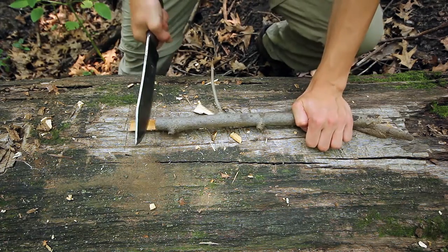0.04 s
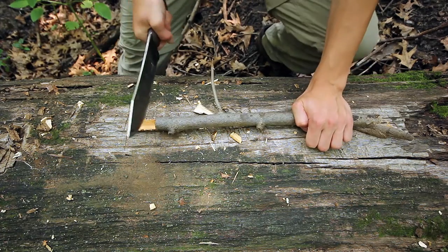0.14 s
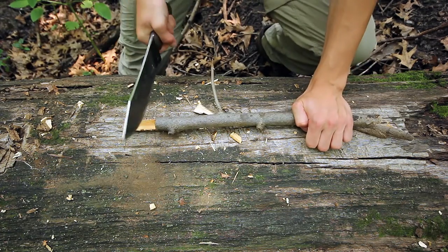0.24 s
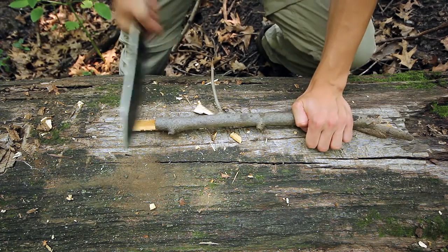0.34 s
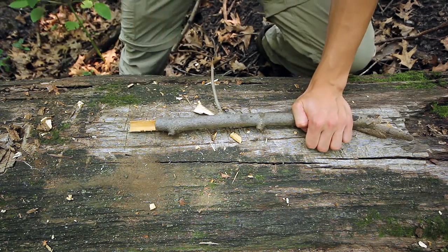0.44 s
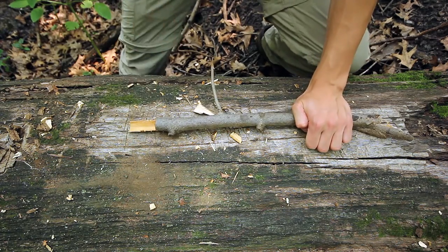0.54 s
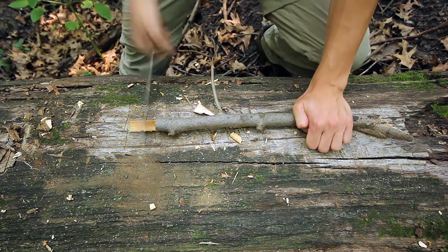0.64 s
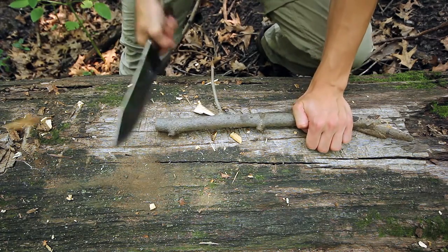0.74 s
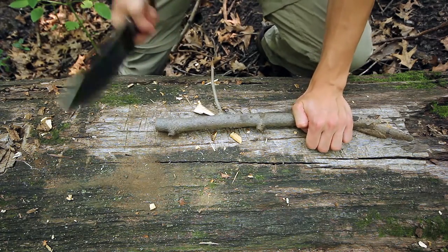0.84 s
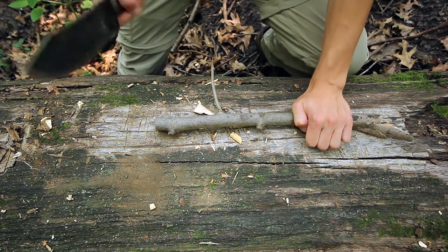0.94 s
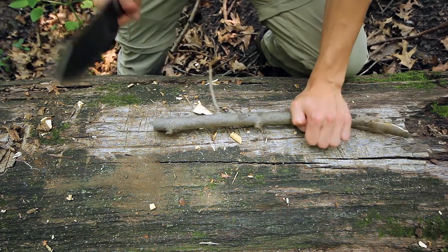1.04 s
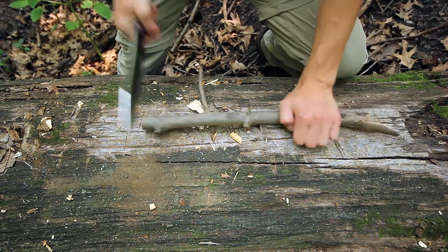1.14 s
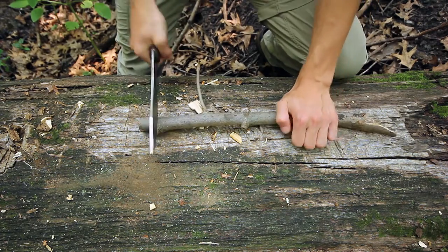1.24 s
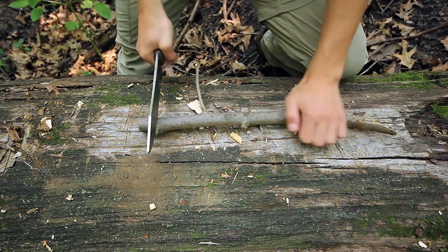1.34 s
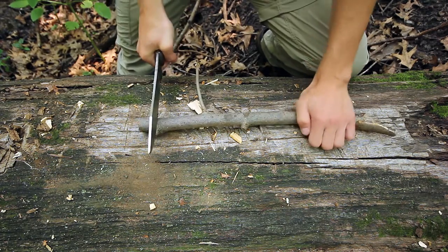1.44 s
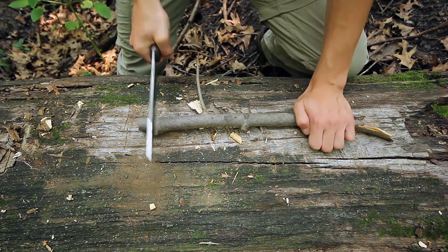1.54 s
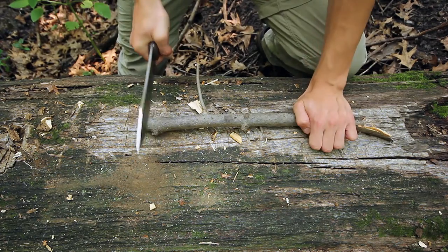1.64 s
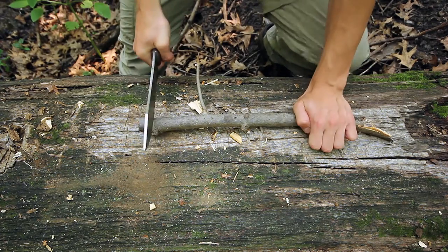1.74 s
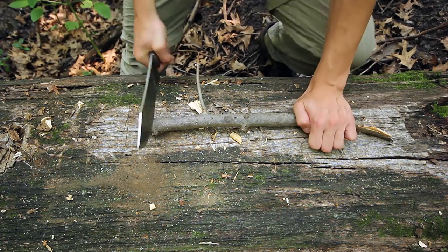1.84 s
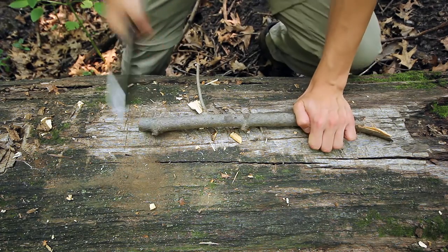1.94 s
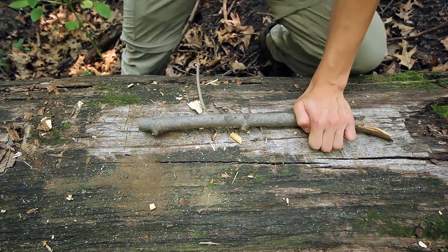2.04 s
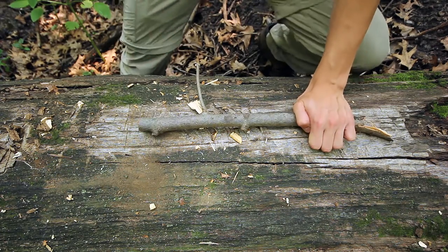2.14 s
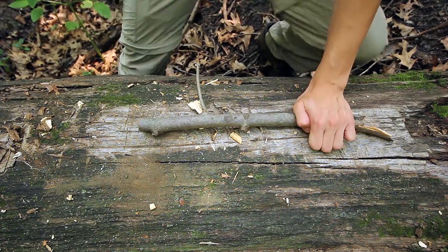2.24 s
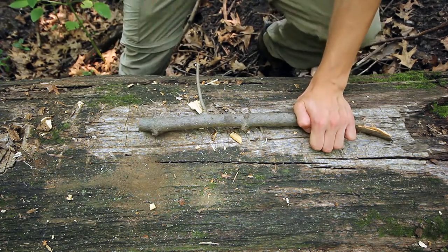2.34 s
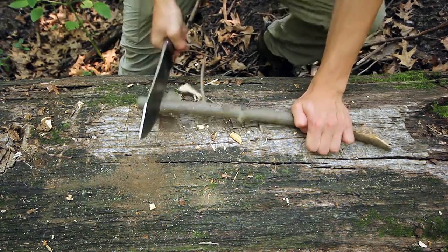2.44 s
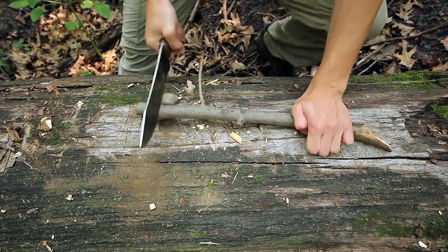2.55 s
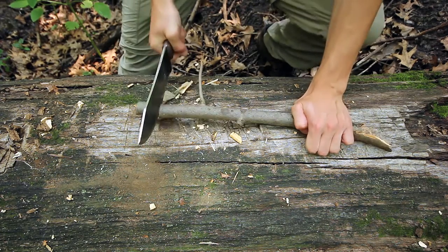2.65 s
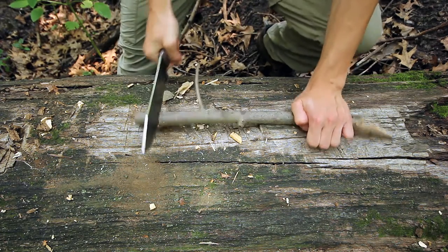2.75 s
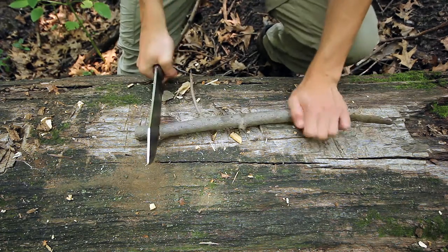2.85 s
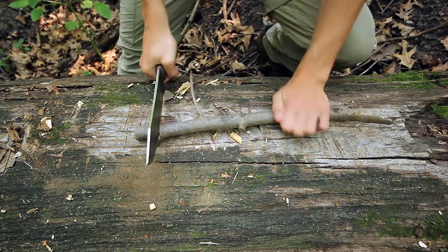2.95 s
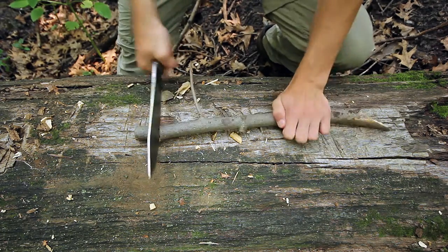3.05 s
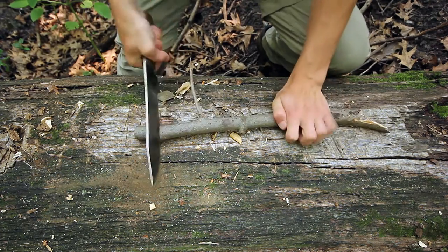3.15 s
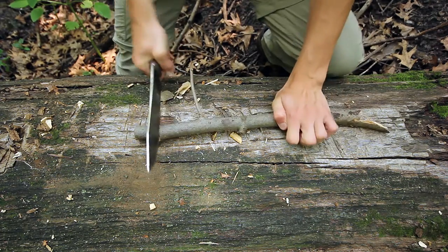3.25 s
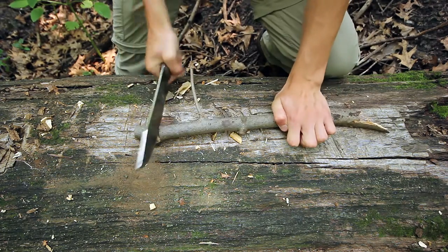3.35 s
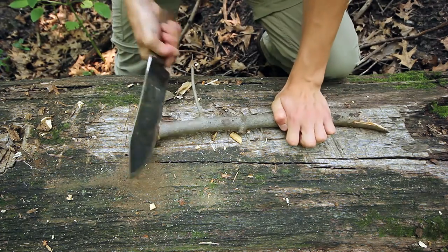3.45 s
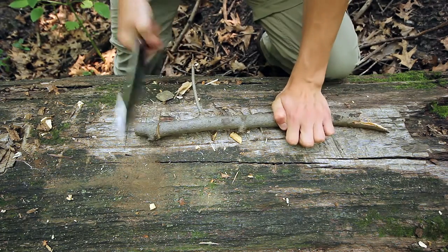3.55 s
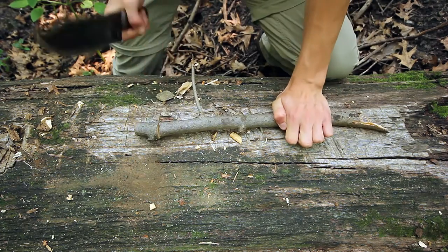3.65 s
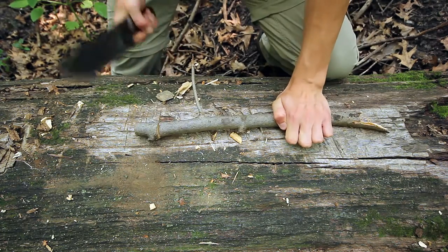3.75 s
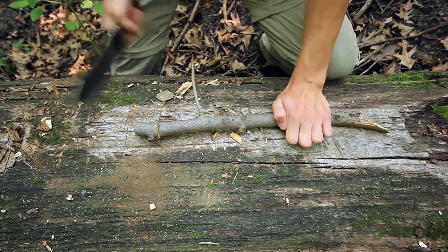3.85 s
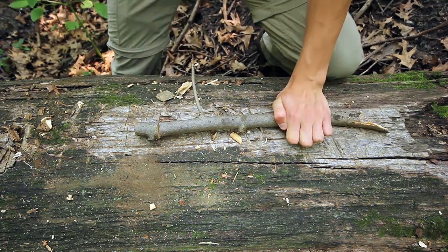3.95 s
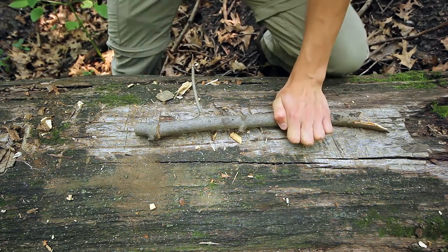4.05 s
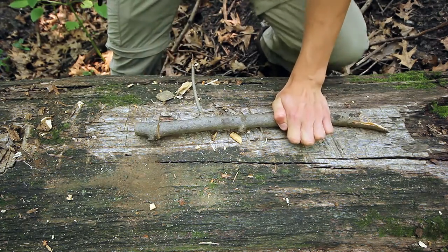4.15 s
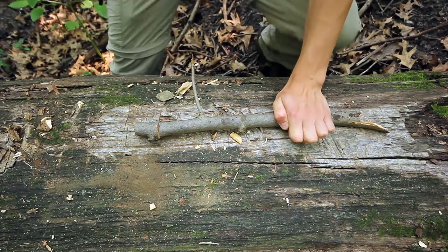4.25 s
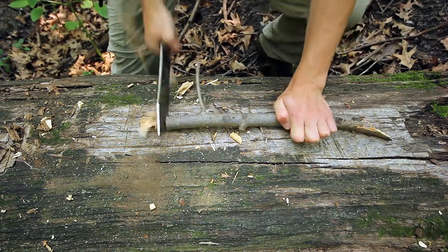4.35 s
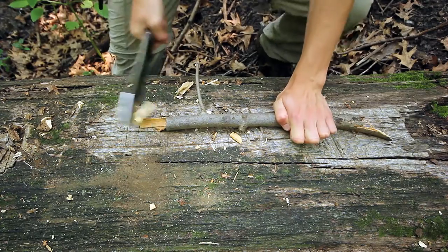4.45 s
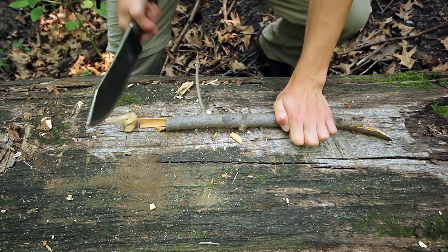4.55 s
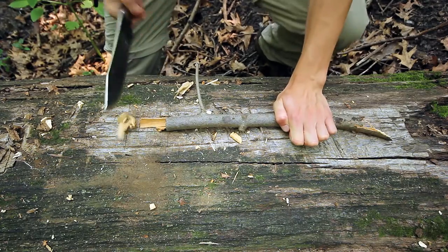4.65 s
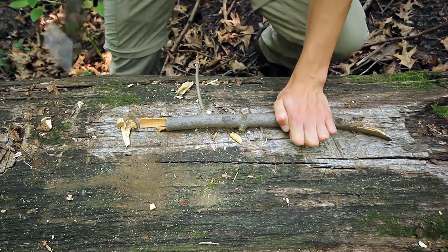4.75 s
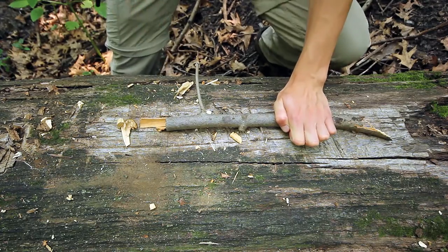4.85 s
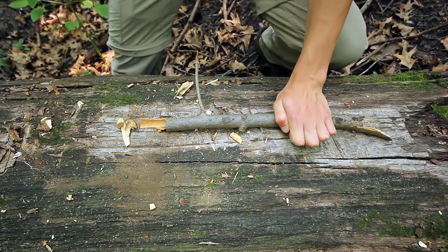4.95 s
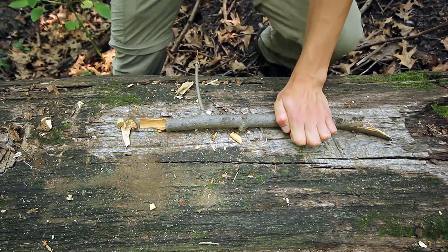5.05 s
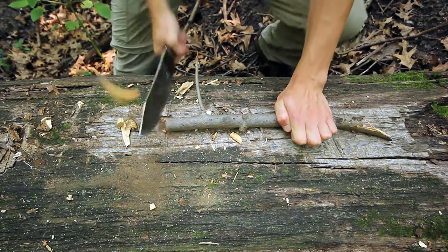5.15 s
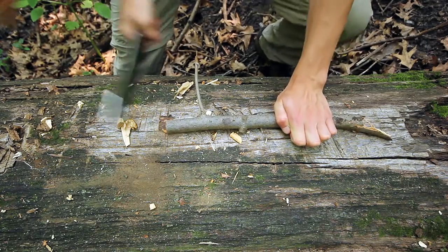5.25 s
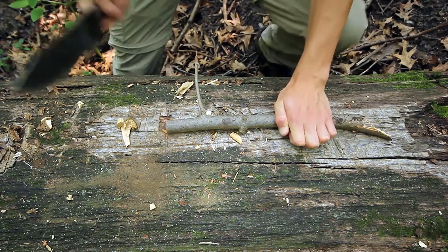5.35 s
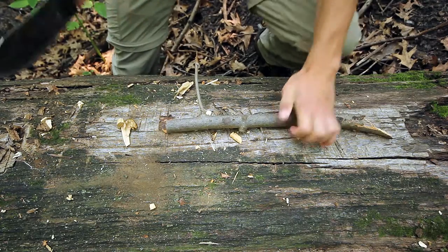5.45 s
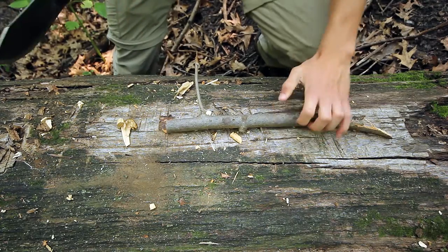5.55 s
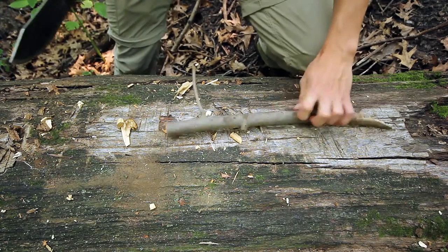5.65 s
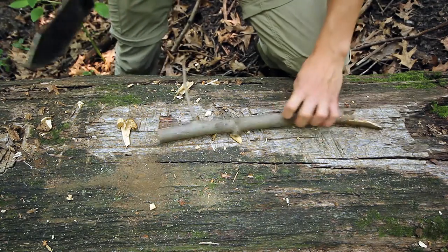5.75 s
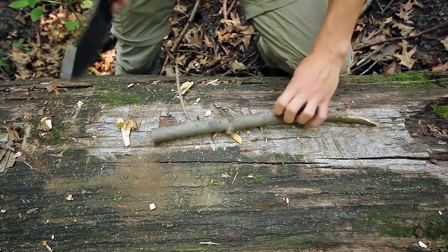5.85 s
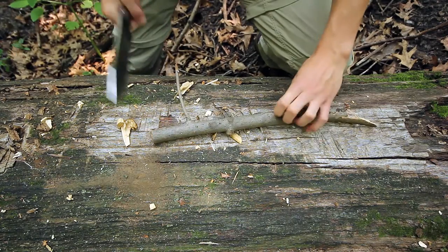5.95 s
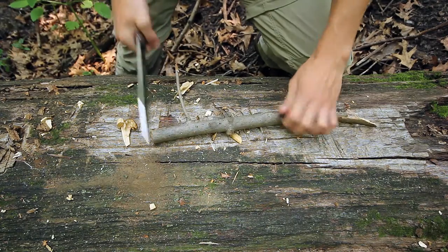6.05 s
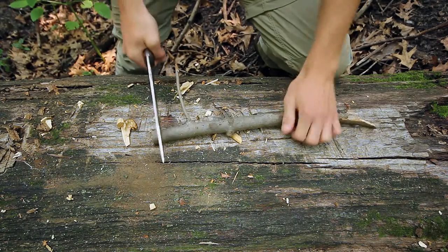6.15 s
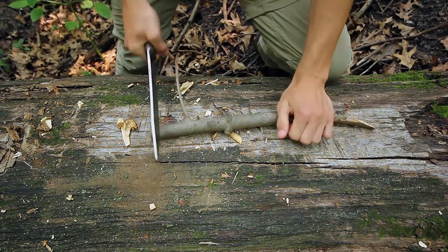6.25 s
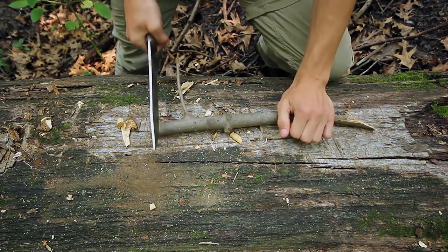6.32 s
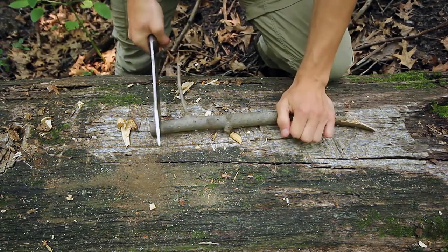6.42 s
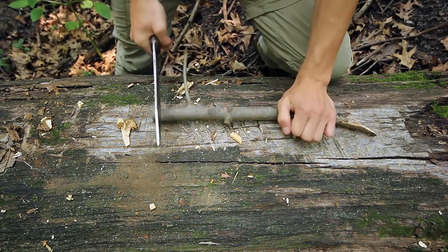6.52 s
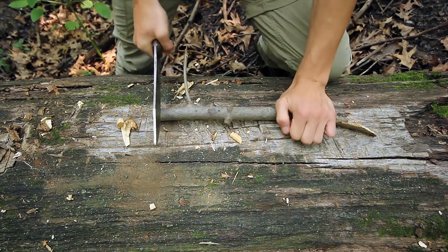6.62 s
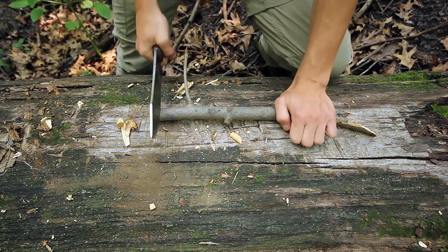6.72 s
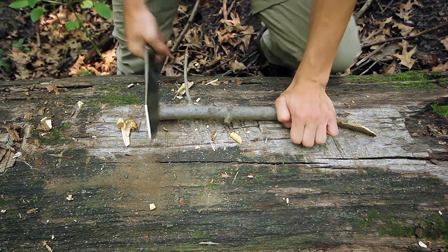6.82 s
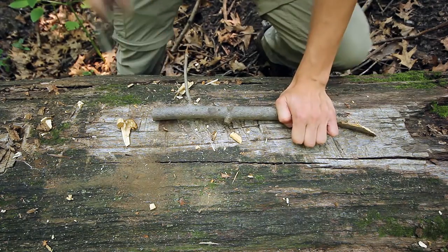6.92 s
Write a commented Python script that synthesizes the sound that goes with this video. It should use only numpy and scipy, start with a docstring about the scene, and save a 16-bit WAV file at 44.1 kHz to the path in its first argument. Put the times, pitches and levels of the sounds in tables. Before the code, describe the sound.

Close, dry cracks of a blade splitting a thin stick against a solid log, five blows irregularly spaced, the first only a light snap. Soft knocks and tiny ticks of aiming and falling chips come in between. A bright, fizzing brook gurgles throughout. The loudest chops slightly overload the microphone, duck the water for a moment and leave a faint woodland echo.

```python
"""A trickling stream in the woods, heard behind a heavy knife close to the microphone, chopping a thin
stick on a fallen log. The water is noise, ringing bubbles and spray, coloured by its stones.
Between chops the blade taps the stick to take aim, and chips drop onto the log and dry leaves: ticks and
soft knocks. A chop is a burst of snapping fibres with wood modes and blade ring; log, ground and trees echo.
Strong chops overload the microphone, and gain control ducks the water for a moment."""
import sys
import numpy as np
from scipy import signal
from scipy.fft import rfft, irfft
from scipy.io import wavfile
from scipy.ndimage import uniform_filter1d, minimum_filter1d

SR = 44100
rng = np.random.default_rng(int(sys.argv[2]) if len(sys.argv) > 2 else 0)


def log_audio(samples):
    """Write samples as a 16-bit WAV file to the path given in sys.argv[1]."""
    # one column per channel
    frames = np.atleast_2d(samples).T
    # limit to full scale, then quantise
    limited = np.clip(frames, -1, 1)
    pcm = np.round(limited * 32767).astype(np.int16)
    wavfile.write(sys.argv[1], SR, pcm)


N = 307814  # length in samples, about 7 s

# Colour of the stream. Each row: frequency in Hz, relative density in dB per Hz.
WATER_COLOUR = [(15, -61), (25, -16), (87, -9), (217, -9), (256, -5.5), (545, -6), (659, -4.5), (1100, -12),
                (1560, -3), (1790, -1.5), (2910, -7.5), (4740, -11), (7310, -12.5), (14800, -24),
                (16000, -28)]
# Hollows among the stream's stones. Each row: frequency in Hz, width in Hz, lift in dB.
STONE_HOLLOWS = [(664, 46, 4), (927, 240, 5.5), (1190, 110, 3), (1550, 140, 2), (1790, 274, -5.5),
                 (2340, 260, 1.5), (2867, 26, 7), (3670, 37, 3.5), (5740, 130, 5), (6430, 270, 3)]
# The clearest bubbles, over the swarm. Each row: start in seconds, level in dB, starting pitch in Hz.
CLEAR_BUBBLES = [(.486, -19, 2370), (1.7236, -20.5, 2250), (1.744, -17, 2810), (1.8385, -17.5, 3700),
                 (2.7247, -16.5, 2050), (3.3324, -18, 2850), (5.1685, -17, 5540), (5.741, -22, 1670),
                 (5.888, -20, 2700), (6.0138, -15.5, 2870), (6.0912, -19, 2340), (6.7224, -20, 2800),
                 (6.743, -20, 1534)]
# Light touches of blade, stick and chips, and the further splits just after the chop at 4.38 s. # Each row:
# start in seconds, tick level in dB, contact time in seconds, tick resonance in Hz, # knock pitch in Hz, knock
# level in dB.
LIGHT_TOUCHES = [(0.1158, -23.5, .0004, 4600, 1500, -40), (0.463, -27.5, .001, 2070, 1480, -25),
                 (0.535, -33, 0.0009, 2310, 467, -27), (.656, -21.5, 0.0031, 8500, 900, -32),
                 (1.3092, -23, 0.0017, 4700, 780, -15), (1.311, -44, .0017, 2500, 175, -29),
                 (1.7614, -21, 0.0014, 4800, 412, -14), (1.7723, -25, 0.00092, 4900, 400, -43),
                 (1.807, -40, .001, 2500, 400, -25), (2.0595, -25, .0007, 2290, 1720, -17),
                 (2.506, -19, 0.0023, 3620, 199, -29), (2.853, -24, 0.0019, 2200, 1180, -19.5),
                 (4.2484, -21, 0.00086, 2500, 1940, -33), (4.39, -7.5, 0.00093, 2670, 730, -8),
                 (4.3943, -12, .0004, 5000, 1000, -34), (4.543, -35, 0.00094, 1150, 720, -19),
                 (4.705, -24.5, 0.011, 8650, 400, -40), (4.939, -32, .0015, 1720, 820, -19.5),
                 (4.9705, -13, .0005, 3240, 650, -22), (5.2145, -23, .001, 2870, 860, -12),
                 (6.191, -32, 0.005, 6500, 344, -28), (6.567, -28.5, 0.0031, 7040, 900, -31)]
# Colour of splitting wood fibres. Each row: frequency in Hz, relative density in dB per Hz.
FIBRE_COLOUR = [(30, -63), (120, -52), (300, -10.5), (800, 0.5), (1500, 2), (2800, 2.5), (5000, 0.5),
                (8000, -2.5), (12000, -9.5), (16000, -26)]
# The chops. Each row: start in seconds, crack level in dB, cutting time in seconds, upper resonance in Hz
# and its strength in dB, lower resonance in Hz and its strength in dB, stick knock in Hz and its level in dB,
# log thump in Hz and its level in dB, blade ring level in dB.
KNIFE_CHOPS = [(.6529, -4, .0001, 8570, 18, 6900, 10.5, 890, -26, 295, -20, -55),
               (.7285, 3, 0.0029, 4480, 11.5, 2970, 1.5, 695, 6, 450, -1.5, -12),
               (2.456, 4, .0012, 3500, 7.5, 1560, 5, 1230, 5.5, 263, -0.5, -55),
               (4.3804, 3, 0.003, 3670, 9, 2200, 2, 930, 7, 390, 9.5, -50),
               (5.1877, 9, 0.0011, 5070, 11, 2740, 8, 709, 12.5, 450, 8.5, -38)]
# Modes of the ringing blade. Each row: frequency in Hz, relative level in dB, 60 dB decay in seconds.
BLADE_MODES = [(4081, -8, .06), (7700, -3, .06), (13370, -3, .06)]
# Colour of the echo from the trees. Each row: frequency in Hz, relative gain in dB.
TREE_COLOUR = [(60, -19), (150, -1), (400, -1.5), (1000, 0.5), (3000, 1.5), (4500, 2), (6000, 0),
               (9000, -5.5), (16000, -34)]

BUBBLE_CYCLES = 68  # a clear bubble falls 60 dB in so many cycles, so small ones die sooner
TICK_T60_S, TICK_DRAG = 0.01, 4.0  # a tick's decay: TICK_T60_S plus TICK_DRAG times its contact time
TICK_LIFT_DB = 8  # strength of a tick's resonance
# Decay of a light knock at KNOCK_HZ; higher knocks die sooner by the power KNOCK_DAMPING.
KNOCK_HZ, KNOCK_T60_S, KNOCK_DAMPING = 400, 0.031, 0.53
CRACK_T60_S = 0.011  # decay of the snapping once the edge is through
STICK_CYCLES, LOG_T60_S = 13, 0.014  # stick decay in cycles; log decay in seconds
OVERTONE_RATIO, OVERTONE_DB = 1.63, -2  # the stick's second mode, against its first
EDGE_HZ = 16150  # upper limit of the recorder's band


def gain_of(db):
    """Turns decibels into a factor."""
    return 10 ** (np.asarray(db) / 20)


def evened(x):
    """Scales to an rms of 1."""
    return x / np.sqrt(np.mean(x ** 2) + 1e-20)


def read(points, hz):
    """Reads a spectrum on a log-frequency axis."""
    f, value = np.transpose(points)
    return np.interp(np.log(hz + 1), np.log(f + 1), value)


def add(mix, s, sound):
    """Mixes a sound in at time s."""
    part = mix[max(round(s * SR), 0):][:len(sound)]
    part += sound[:len(part)]


def noise(gain):
    """Random-phase noise of rms 1 with the given relative gain in each frequency bin."""
    phase = 2 * np.pi * rng.random(len(gain))
    return evened(irfft(gain * np.exp(1j * phase)))


def fade(t, t60):
    """Free decay: 60 dB down after t60 seconds."""
    return np.exp(-np.log(1000) * t / t60)


def wander(per_s):
    """Random wandering of rms 1, with per_s new values a second joined by straight lines."""
    knots = rng.standard_normal(2000)
    return evened(np.interp(np.arange(N) * per_s / SR, np.arange(len(knots)), knots))


def scatter(per_s, spread_db):
    """Random impulses of either sign, mostly small and a few large."""
    size = gain_of(spread_db * np.minimum(rng.exponential(1, N), 4))
    return size * rng.choice([-1, 1], N) * (rng.random(N) < per_s / SR)


def bubble(hz, t60, glide=0.067):
    """A bubble rings and rises a little in pitch as it nears the surface."""
    t = np.arange(int(t60 * SR) + 2) / SR
    tone = np.sin(2 * np.pi * hz * t * (1 + glide * t / t60))
    return tone * fade(t, t60) * (1 - np.exp(-t * hz / 1.5))


def bubble_swarm(bubbles_per_s, cycles, gurgle_db, small_hz, count):
    """Many small bubbles ring at random; bubbles of like size swell together in gurgles."""
    swarm = np.zeros(N)
    for pitches in np.geomspace(500, 10500, count).reshape(-1, 10):
        rings = [bubble(f * rng.uniform(.98, 1.02), min(cycles * rng.uniform(.6, 1.5) / f, .035))
                 for f in pitches]
        group = np.zeros(N)
        for ring in rings:
            starts = scatter(bubbles_per_s / count, 3.3)
            group += signal.oaconvolve(starts, ring / np.linalg.norm(ring))[:N]
        # the smallest bubbles are faint
        share = np.sqrt(pitches[0]) / np.hypot(1, (pitches[0] / small_hz) ** 2)
        swarm += share * group * gain_of(gurgle_db * wander(35))
    return swarm


def spray(ticks_per_s=220, spread_db=5, life_s=0.0024, count=6):
    """Tiny drops burst on stone: decaying bursts of noise, each about an octave wide."""
    hz = np.fft.rfftfreq(N, 1 / SR)
    spectrum = 0
    for centre_hz in np.geomspace(1500, 12000, count):
        size = signal.lfilter([1], [1, -np.exp(-1 / (life_s * SR))], scatter(ticks_per_s, spread_db))
        band = np.exp(-(2 * np.log2((hz + 1) / centre_hz)) ** 2 / 2)
        spectrum = spectrum + rfft(evened(size * rng.standard_normal(N))) * band
    return irfft(spectrum, N)


def stream(wash_db=-40.5, fizz_db=-40, spray_db=-40.5, surge_db=1):
    """A wash of far water, a swarm of small bubbles and bright ticks of spray, coloured by the stones."""
    hz = np.fft.rfftfreq(N, 1 / SR)
    colour_db = read(WATER_COLOUR, hz)
    for f, width, db in STONE_HOLLOWS:
        colour_db = colour_db + db * np.exp(-2 * ((hz - f) / width) ** 2)
    colour = gain_of(colour_db)
    swarm = bubble_swarm(bubbles_per_s=1000, cycles=34, gurgle_db=3.0, small_hz=5000, count=80)
    water = gain_of(wash_db) * noise(colour / np.hypot(1, hz / 11000))
    water += gain_of(fizz_db) * evened(irfft(rfft(swarm) * colour, N))
    water += gain_of(spray_db) * evened(irfft(rfft(spray()) * colour, N))
    water *= gain_of(surge_db * wander(30))
    for s, db, f in CLEAR_BUBBLES:
        add(water, s, gain_of(db) * bubble(f, BUBBLE_CYCLES / f))
    return water


def causal(gain):
    """Gives a gain curve the phase of a filter that only rings after its cause."""
    mirrored = np.r_[gain, gain[-2:0:-1]]
    log_gain = np.log(np.maximum(mirrored, 1e-5))
    return np.exp(np.conj(signal.hilbert(log_gain)))[:len(gain)]


def crack(cut, t60, resonances, width=1 / 8):
    """Fibres snap while the edge cuts, then die away, coloured by resonances (Hz, dB) of the wood."""
    t, hz = np.arange(8192) / SR, np.fft.rfftfreq(8192, 1 / SR)
    envelope = fade(np.maximum(t - cut, 0), t60)
    snaps = rfft(rng.standard_normal(len(t)) * envelope)
    snaps /= np.sqrt(uniform_filter1d(abs(snaps) ** 2, size=50))  # they excite all bands alike
    # the resonances (dB) add to the fibres' colour (dB)
    colour_db = read(FIBRE_COLOUR, hz)
    for f, db in resonances:
        colour_db = colour_db + db / (1 + ((hz / f - 1) / width) ** 2)
    sound = irfft(snaps * causal(gain_of(colour_db)))[:len(t) // 2]
    return sound * np.linalg.norm(envelope) / np.linalg.norm(sound)


def knock(hz, t60, rise):
    """A heavily damped mode of wood, pushed for a moment."""
    t = np.arange(4096) / SR
    return np.sin(2 * np.pi * hz * t) * fade(t, t60) * (1 - np.exp(-t / rise))


def taps(push_s=0.00056):
    """Small contacts: a dry tick, longer when the contact drags, and a soft knock, longer when low."""
    out = np.zeros(N)
    for s, db, contact, tick_hz, knock_hz, knock_db in LIGHT_TOUCHES:
        tick = crack(contact, TICK_T60_S + TICK_DRAG * contact, [(tick_hz, TICK_LIFT_DB)])
        add(out, s, gain_of(db) * tick)
        knock_t60 = KNOCK_T60_S * (KNOCK_HZ / knock_hz) ** KNOCK_DAMPING
        add(out, s, gain_of(knock_db) * knock(knock_hz, knock_t60, push_s))
    return out


def blade_ring():
    """The steel rings in a few decaying modes."""
    t = np.arange(SR // 2) / SR
    return sum(gain_of(db) * np.sin(2 * np.pi * hz * t) * fade(t, t60) for hz, db, t60 in BLADE_MODES)


def chops(push_s=0.0018, lag_s=0.00046):
    """The edge splits the stick, the stick knocks on the log, the log thumps back and the blade rings."""
    out, ring = np.zeros(N), blade_ring()
    for (s, db, cut, upper_hz, upper_db, lower_hz, lower_db,
         stick_hz, stick_db, log_hz, log_db, ring_db) in KNIFE_CHOPS:
        split = crack(cut, CRACK_T60_S, [(upper_hz, upper_db), (lower_hz, lower_db)])
        add(out, s, gain_of(db) * split)
        add(out, s, gain_of(ring_db) * ring)
        stick = knock(stick_hz, STICK_CYCLES / stick_hz, push_s)
        overtone_hz = OVERTONE_RATIO * stick_hz
        overtone = knock(overtone_hz, STICK_CYCLES / overtone_hz, push_s)
        add(out, s + lag_s, gain_of(stick_db) * (stick - gain_of(OVERTONE_DB) * overtone))
        add(out, s + lag_s, -gain_of(log_db) * knock(log_hz, LOG_T60_S, push_s))
    return out


def surroundings(x, near_db=-16, near_t60=0.038, lumpy_db=5.5, thud_db=-26, thud_t60=0.12, thud_hz=550,
                 thud_low_hz=130, far_db=-25, far_t60=1.1, distinct_db=-28):
    """Log and ground scatter the sound at once, the trunk thuds, and the trees send a long faint echo."""
    t, hz = np.arange(SR) / SR, np.fft.rfftfreq(SR, 1 / SR)
    lumps = gain_of(lumpy_db * wander(270)[:SR])  # bark and leaves return the sound unevenly
    near = noise(1 / np.hypot(1, hz / 7000)) * lumps * fade(t, near_t60) * (t > .002)
    thud_colour = hz ** 2 / (hz ** 2 + thud_low_hz ** 2) / (1 + (hz / thud_hz) ** 2)
    thud = noise(thud_colour) * fade(t, thud_t60)
    # part of the echo keeps the colour of a blow
    distinct = noise(gain_of(read(TREE_COLOUR, hz))) * fade(t, far_t60)
    paths = [(near, near_db), (thud, thud_db), (distinct, distinct_db)]
    response = sum(gain_of(db) * path / np.linalg.norm(path) for path, db in paths)
    returned = signal.fftconvolve(x, response)[:N]
    # the rest is diffuse: it keeps only the energy
    linger = (fade(t, far_t60) * (1 - np.exp(-t / 0.0058))) ** 2
    energy = abs(signal.fftconvolve(x ** 2, linger / linger.sum())[:N])
    diffuse = noise(gain_of(read(TREE_COLOUR, np.fft.rfftfreq(N, 1 / SR))))
    return returned + gain_of(far_db) * np.sqrt(energy) * diffuse


def scene():
    """Knife and wood close by, the stream behind."""
    wood = chops() + taps()
    return (wood + surroundings(wood) + stream())[None]


def smoothed(x, time_s):
    """Follows a signal with a one-pole lag of time_s."""
    r = np.exp(-1 / (time_s * SR))
    return signal.lfilter([1 - r], [1, -r], x)


def record(dry, threshold_db=-19, slope=0.59, most_db=11, hold_s=0.11, recover_db_per_s=30,
           attack_s=0.0058, low_cut_hz=120, start_db=8.0):
    """Gain control starts turned down and ducks after loud blows, too late to stop clipping; band limits follow."""
    power_db = 10 * np.log10(smoothed(dry[0] ** 2, attack_s) + 1e-12)
    over_db = np.clip(slope * (power_db - threshold_db), 0, most_db)
    half = int(hold_s * SR / 2)
    # the greatest reduction of the last hold_s stays in force
    held_db = -minimum_filter1d(-over_db, 2 * half + 1, origin=half, mode="constant")
    # afterwards the gain recovers at a steady rate
    fall_db = np.arange(N) * recover_db_per_s / SR
    wanted_db = np.maximum.accumulate(np.maximum(held_db + fall_db, start_db)) - fall_db
    duck_db = start_db + smoothed(wanted_db - start_db, 0.0065)
    clipped = np.clip(dry * gain_of(-duck_db), -1, 1)
    thinned = signal.lfilter(*signal.butter(1, low_cut_hz, "high", fs=SR), clipped)
    low_pass = signal.firwin(255, EDGE_HZ, window=("kaiser", 8), fs=SR)
    return signal.oaconvolve(thinned, low_pass[None], "same")


dry = scene()
out = record(dry)
log_audio(out)
```